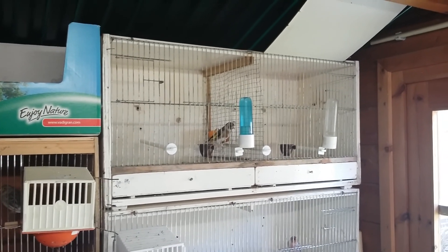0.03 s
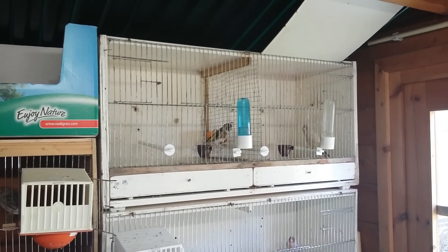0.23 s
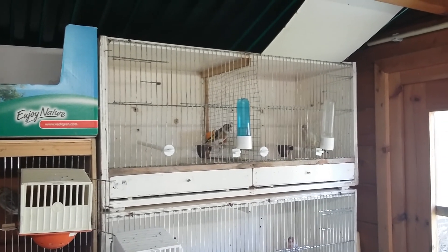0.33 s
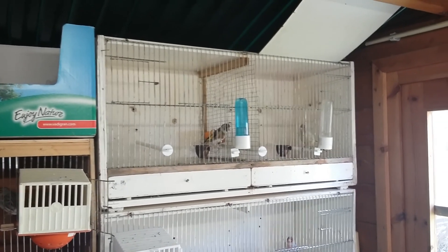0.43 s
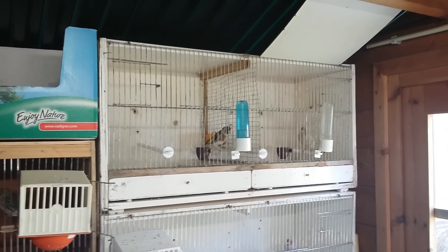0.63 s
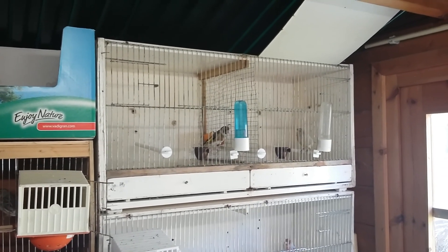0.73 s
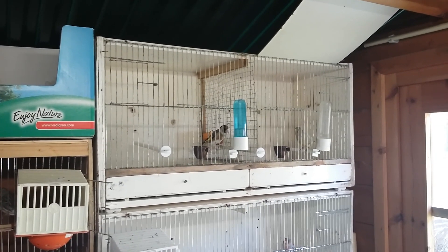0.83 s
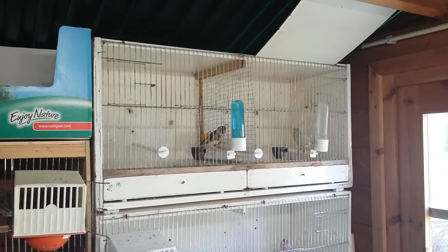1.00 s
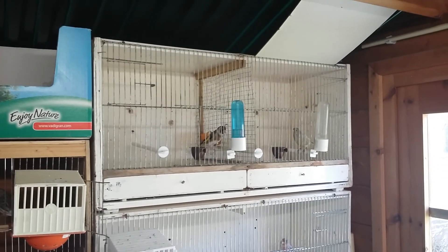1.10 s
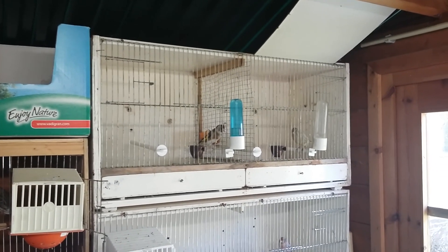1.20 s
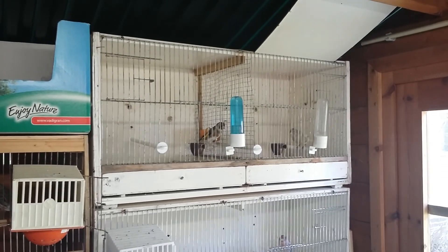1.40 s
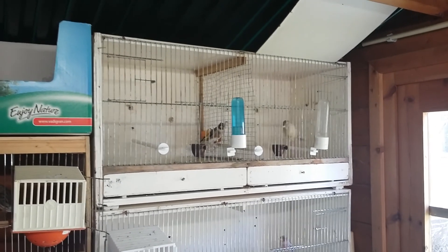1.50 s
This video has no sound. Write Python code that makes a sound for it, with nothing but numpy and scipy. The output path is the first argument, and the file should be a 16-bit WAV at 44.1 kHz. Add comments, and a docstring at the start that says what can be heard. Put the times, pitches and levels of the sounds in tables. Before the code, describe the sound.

A finch gives three high whistles and a quick trill inside a shed.

```python
"""In a wooden shed, a caged finch on the left gives three level whistles and a trill of ten upward sweeps.
A second bird chips softly; each voice is a nearly pure oscillation of the syrinx.
Light knocks excite the damped modes of the cages, and there is one dull scuff.
Cage and shed walls add early reflections and reverberation, over a low hum, room noise and a rustle."""
import sys
import numpy as np
from scipy import signal
from scipy.fft import rfft, irfft, next_fast_len
from scipy.io import wavfile
from scipy.ndimage import uniform_filter1d

SR = 44100
rng = np.random.default_rng(int(sys.argv[2]) if len(sys.argv) > 2 else 0)


def log_audio(samples):
    """Write samples as a 16-bit WAV file to the path given in sys.argv[1]."""
    # one column per channel
    frames = np.atleast_2d(samples).T
    # limit to full scale, then quantise
    limited = np.clip(frames, -1, 1)
    pcm = np.round(limited * 32767).astype(np.int16)
    wavfile.write(sys.argv[1], SR, pcm)


N = 68355
TIME = np.arange(N) / SR


def amp(db):
    return 10 ** (np.asarray(db) / 20)


def unit_rms(x):
    return x / np.sqrt(np.mean(x ** 2) + 1e-20)


def along(points, hz):
    """Interpolation of (Hz, value) points on a logarithmic frequency axis."""
    f, v = np.transpose(points)
    return np.interp(np.log(hz + 1), np.log(f + 1), v)


def ramp(u):
    """Raised-cosine step from 0 to 1."""
    return np.sin(np.pi / 2 * np.clip(u, 0, 1)) ** 2


def wobble(rate, size=N):
    """Random modulation: a smooth curve through `rate` Gaussian knots a second."""
    at = np.arange(size) * rate / SR
    knots = rng.standard_normal(int(at[-1]) + 3)
    k = at.astype(int)
    u = at - k
    return knots[k] + (knots[k + 1] - knots[k]) * u * u * (3 - 2 * u)


def filtered(x, response):
    """Linear filtering: the spectrum of x times a frequency response."""
    n = x.shape[-1]
    m = next_fast_len(n + 4096, real=True)
    return irfft(rfft(x, m) * response(np.fft.rfftfreq(m, 1 / SR)), m)[..., :n]


def add(out, start, x):
    """Superposition of x on out from a start time in seconds."""
    part = out[..., max(round(start * SR), 0):][..., :x.shape[-1]]
    part += x[..., :part.shape[-1]]


# likeness of left and right (frequency [Hz], coherence [ratio])
COHERENCE = [(60, 0.87), (250, 0.95), (500, .7), (1000, 0.14), (8000, .05)]
def noise(spectrum, size=N):
    """Spatial coherence: stereo noise of unit rms, nearly alike in both channels at long wavelengths."""
    def mid_side_gains(hz):
        angle = np.arccos(np.clip(along(COHERENCE, hz), -1, 1)) / 2
        return amp(along(spectrum, hz)) * [np.cos(angle), np.sin(angle)]
    mid, side = filtered(rng.standard_normal((2, size)), mid_side_gains)
    return unit_rms(np.array([mid + side, mid - side]))


# partials of the hum (frequency [Hz], rms level at 0 dB gain [dB])
HUM_PARTIALS = [(87.6, -45), (175, -65), (263, -72.5)]
# its slow wavering (time [s], gain [dB])
HUM_GAIN = [(0, 1.5), (.13, -1), (.28, -4.5), (.48, 3), (.75, 0), (1.15, -1), (1.5, 2)]
def hum():
    """A harmonic series under slow amplitude and phase modulation."""
    out = np.zeros(N)
    for hz, db in HUM_PARTIALS:
        peak = np.sqrt(2) * amp(db + .15 * wobble(4.4))
        out += peak * np.sin(2 * np.pi * hz * TIME + .1 * wobble(3))
    return out * amp(np.interp(TIME, *np.transpose(HUM_GAIN)))


# spectrum of the room noise (frequency [Hz], relative level [dB])
ROOM_SPECTRUM = [(25, -18), (55, 0), (110, -5.5), (170, 1), (300, -7), (700, -15.5), (1500, -17.5),
                 (3200, -28), (5500, -26.5), (9000, -39), (15500, -43.5)]
def room_noise():
    """Stationary broadband noise, strongest in the bass."""
    return amp(-55.5) * noise(ROOM_SPECTRUM)


# envelope of the rustle (time [s], level [dB])
RUSTLE_ENVELOPE = [(0, -55), (.38, -55.5), (.52, -49.5), (.63, -45.5), (.8, -49.5), (.96, -61.5),
                   (1.0, -46.5), (1.13, -60.5), (1.17, -51), (1.3, -59.5), (1.42, -68.5), (1.55, -57.5)]
# its spectrum (frequency [Hz], relative level [dB])
RUSTLE_SPECTRUM = [(100, -10), (200, 0), (400, -2), (800, -5.5), (1500, -8.5), (3000, -15), (6000, -20.5),
                   (9000, -42.5), (15000, -47.5)]
# resonances it stirs (frequency [Hz], half-width [Hz], boost [dB])
RUSTLE_RESONANCES = [(436.3, 10, 8.5), (670, 12, 6), (804, 22, 7)]
def rustle():
    """Forced resonance: faint, fluctuating noise drives three narrow peaks."""
    def resonances(f):
        return amp(sum(db / (1 + ((f - hz) / width) ** 2) for hz, width, db in RUSTLE_RESONANCES))
    level_db = np.interp(TIME, *np.transpose(RUSTLE_ENVELOPE)) + .8 * wobble(30)
    return amp(level_db) * unit_rms(filtered(noise(RUSTLE_SPECTRUM), resonances))


def burst(spectrum, peak_s, db, rise_s, t60):
    """A noise transient: exponential growth, then a decay of 60 dB in t60 seconds."""
    t = TIME - peak_s
    rise = np.exp(np.minimum(t, 0) / rise_s)
    decay = amp(db - 60 * np.maximum(t, 0) / t60)
    return rise * decay * noise(spectrum)


# spectrum of the scuff (frequency [Hz], relative level [dB])
SCUFF_SPECTRUM = [(150, -10), (400, -2.5), (600, 3), (900, -6.5), (1150, 0), (1500, -16.5), (1950, -5),
                  (2800, -20.5), (5500, -20.5), (9000, -47.5), (15000, -50.5)]
def scuff():
    """An aperiodic transient, dull because its energy lies mostly below 2 kHz."""
    return burst(SCUFF_SPECTRUM, peak_s=.049, db=-36.5, rise_s=.0036, t60=.24)


# light knocks on perch and cage (time [s], level [dB], spectral tilt [dB/octave])
IMPACTS = [(.143, -53, 0), (1.289, -53.5, 6.5), (1.320, -51, 8), (1.470, -45, -1.5), (1.512, -43.5, 3)]
# cage modes (frequency [Hz], relative level [dB], 60 dB decay time [s])
CAGE_MODES = [(648.4, -3.5, 0.4), (790, -8.5, 0.29), (1166, -5, .13), (1302, -1.5, .15), (2178, -1.5, 0.12),
              (4290, -11.5, 0.15), (4705, -18, .1)]
# noise of a knock before tilting (frequency [Hz], relative level [dB])
IMPACT_SPECTRUM = [(200, -3), (600, -1), (1300, -10.5), (2400, -5.5), (3200, -15.5), (4500, -10),
                   (7000, -22.5), (10000, -45)]
def knocks():
    """Impact excitation: damped cage modes ring over a puff of noise; loose parts blur their phase."""
    pivot_hz, blur_rad = 1300, .7
    out, t = np.zeros((2, N)), np.arange(SR // 4) / SR
    for start, db, tilt in IMPACTS:
        tilt_db = lambda hz: tilt * np.log2(hz / pivot_hz)
        ring = np.zeros((2, len(t)))
        for hz, level, t60 in CAGE_MODES:
            blur = blur_rad * hz / pivot_hz * wobble(110, 2 * len(t)).reshape(2, -1)
            phase = 2 * np.pi * hz * t + blur + rng.uniform(0, 2 * np.pi)
            ring += amp(level + tilt_db(hz) - 60 * t / t60) * np.sin(phase)
        spectrum = [(hz, level + tilt_db(hz)) for hz, level in IMPACT_SPECTRUM]
        puff = amp(-2 - 60 * t / .3) * noise(spectrum, len(t))
        add(out, start, amp(db) * ramp(t / .003) * (ring + puff))
    return out


def syrinx(hz, overtones_db=()):
    """A nearly pure oscillation: phase is the integral of frequency, and harmonics are locked to it."""
    phase = 2 * np.pi * np.cumsum(hz) / SR
    overtones = sum(amp(db) * np.sin(k * phase) * (k * hz < SR / 2)
                    for k, db in enumerate(overtones_db, 2))
    return np.sin(phase) + overtones


# reverberation of the shed (frequency [Hz], 60 dB decay time [s])
SHED_T60 = [(500, 0.12), (3000, 0.21), (6000, 0.2), (9000, 0.12), (15000, 0.11)]
# reflections from cage and shed walls (delay [s], relative gain [ratio])
WALL_ECHOES = [(.0031, .4), (.0074, .16), (.0118, .17), (0.0175, .16)]
def shed(x, wet_db, right_db, echo_gain, echoes=WALL_ECHOES):
    """Room response: direct sound, early reflections and a diffuse tail, all weaker on the right."""
    hz, t, spectra = signal.stft(rng.standard_normal((2, SR // 2)), SR, nperseg=256)
    decay = amp(-60 * t / along(SHED_T60, hz)[:, None])
    tail = signal.istft(spectra * decay * ramp(t / .014), SR, nperseg=256)[1]
    diffuse = signal.fftconvolve(x[None], tail, axes=1)[:, :N]
    diffuse *= amp(wet_db) * x.std() / diffuse.std(axis=1, keepdims=True)
    comb = lambda f: sum(gain * np.exp(-2j * np.pi * f * delay) for delay, gain in echoes)
    early = echo_gain * filtered(x, comb)
    return (x + early + diffuse) * amp([[0], [right_db]])


# the finch's whistles (time [s], duration [s], pitch [Hz], level [dB], fade [dB/s], closing lift [Hz])
WHISTLE_NOTES = [(.200, 0.091, 5018, -8, 199, 7.5), (0.308, 0.065, 4943, -8, 30.5, 190),
                 (.427, .066, 4935, -6, 90.5, 30)]
# brief dips in their level (time [s], depth [dB])
WHISTLE_DIPS = [(0.223, 3.7), (.339, 3), (0.464, 7.1)]
# their reflections (delay [s], relative gain [ratio])
WHISTLE_ECHOES = [(.0140, .1), (.0230, .13), (.0370, .09)]
def whistles():
    """Sustained oscillation: each note scoops up, holds its pitch as it fades, and may lift at the end."""
    scoop_hz, scoop_s = 910, .0082
    lift_lead_s, lift_s = .013, .036
    attack_s, release_s, dip_s = .026, .024, .005
    out, t = np.zeros(N), np.arange(SR // 8) / SR
    for start, length, hz, db, fade, lift_hz in WHISTLE_NOTES:
        scoop = scoop_hz * np.exp(-(t / scoop_s) ** 1.3) * (1 + .33 * wobble(1300, len(t)))
        lift = lift_hz * ramp((t - length + lift_lead_s) / lift_s)
        pitch = hz - scoop + lift + 6 * wobble(250, len(t))
        attack = .029 * ramp(t / .004) + ramp(t / attack_s) ** 2
        release = ramp(.5 + (length - t) / release_s)
        level_db = db + .5 * wobble(120, len(t)) - fade * np.maximum(t - attack_s, 0)
        add(out, start, amp(level_db) * attack * release * syrinx(pitch, overtones_db=[-52.5, -53]))
    dips_db = sum(depth * np.exp(-((TIME - at) / dip_s) ** 2) for at, depth in WHISTLE_DIPS)
    return shed(out * amp(-dips_db), wet_db=-10, right_db=-23, echo_gain=.94, echoes=WHISTLE_ECHOES)


# the second bird's chips (time [s], duration [s], centre pitch [Hz], level [dB])
CHIP_NOTES = [(0.403, .018, 2363, -44), (0.459, .012, 2569, -33), (.467, .019, 2539, -35)]
def chips():
    """Random frequency modulation makes falling notes hoarse; at a distance, reverberation dominates."""
    fall_hz_per_s, jitter_hz = 22000, 172.4
    out = np.zeros(N)
    for start, length, hz, db in CHIP_NOTES:
        t = np.clip(TIME - start, 0, length)
        pitch = hz - fall_hz_per_s * (t - length / 2) + jitter_hz * wobble(600)
        out += amp(db) * np.sin(np.pi * t / length) * syrinx(pitch, overtones_db=[-14])
    return shed(out, wet_db=2.5, right_db=-.5, echo_gain=.54)


# spectrum of the rasp (frequency [Hz], relative level [dB])
RASP_SPECTRUM = [(1200, -24), (1900, 2), (2700, -5), (3200, -24), (4000, -2.5), (5000, -1), (6000, -37.5),
                 (8500, -44), (11000, -27), (14000, -39.5)]
def rasp():
    """Aperiodic sound: the last chip breaks into bands of noise."""
    return burst(RASP_SPECTRUM, peak_s=.482, db=-41.5, rise_s=.015, t60=.2)


# the finch's trill notes (time of peak [s], level [dB], top pitch [Hz])
TRILL_NOTES = [(.612, -17, 8650), (.676, -15.5, 8600), (.745, -15, 8400), (.817, -14.5, 8600),
               (.885, -11.5, 8450), (0.9534, -11.5, 8400), (1.022, -11.5, 8450), (1.091, -11, 8500),
               (1.160, -11.5, 8500), (1.2417, -12, 8250)]
# envelope of every sweep (time from peak [ms], relative level [dB])
SWEEP_ENVELOPE = [(-22, -48.5), (-16, -15), (-16, -30.5), (-9, -22), (-4.5, -13), (0.5, -1), (4, -4),
                  (6, -12), (9.5, -18.5), (14.5, -51)]
# shared contour, before each note bends to its own top (time from peak [ms], pitch [Hz])
SWEEP_CONTOUR = [(-20.5, 4770), (-11.5, 5525), (-3, 5894), (1, 6200), (3.5, 6610), (7, 7450), (9.5, 8364),
                 (13, 8787)]
# second harmonic (frequency [Hz], level relative to the fundamental [dB])
SECOND_HARMONIC = [(9800, -25), (10800, -32), (11700, -32.5), (12500, -48), (13300, -50), (14500, -30),
                   (15800, -24)]
def trill():
    """Frequency sweeps, loudest before the last upward flick, with a rough, more reverberant octave."""
    flick_s, octave_jitter_hz = .0071, 254
    fundamental, octave = np.zeros((2, N))
    shape_ms, shape_db = np.transpose(SWEEP_ENVELOPE)
    contour_ms, contour_hz = np.transpose(SWEEP_CONTOUR)
    t = np.arange(-SR // 40, SR // 50) / SR
    t_ms = 1000 * t
    gate = (t_ms > shape_ms[0]) * (t_ms < shape_ms[-1])
    for peak_s, db, top_hz in TRILL_NOTES:
        bend = (top_hz - contour_hz[-1]) * ramp(t / flick_s)
        pitch = np.interp(t_ms, contour_ms, contour_hz) + bend + 45 * wobble(500, len(t))
        level_db = db + np.interp(t_ms, shape_ms, shape_db) + 1.1 * wobble(400, len(t))
        envelope = uniform_filter1d(gate * amp(level_db), size=64)  # soft edges
        overtone = syrinx(2 * pitch + octave_jitter_hz * wobble(1000, len(t)))
        add(fundamental, peak_s + t[0], envelope * syrinx(pitch))
        add(octave, peak_s + t[0], envelope * amp(along(SECOND_HARMONIC, 2 * pitch)) * overtone)
    return (shed(fundamental, wet_db=-.5, right_db=-17, echo_gain=1.44)
            + shed(octave, wet_db=2.5, right_db=-8.5, echo_gain=.9))


def scene():
    """Superposition: the pressures of all sources add."""
    return hum() + room_noise() + rustle() + scuff() + knocks() + whistles() + chips() + rasp() + trill()


def record(dry):
    """Band limiting by an ideal low-pass filter."""
    return filtered(dry, lambda hz: hz < 15850)


dry = scene()
out = record(dry)
log_audio(out)
```